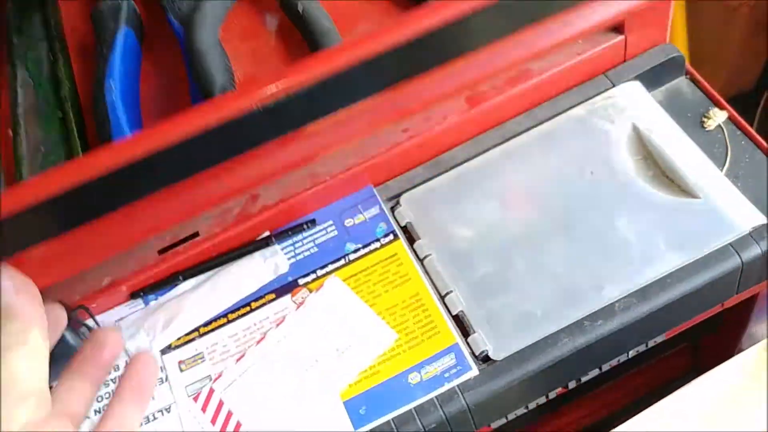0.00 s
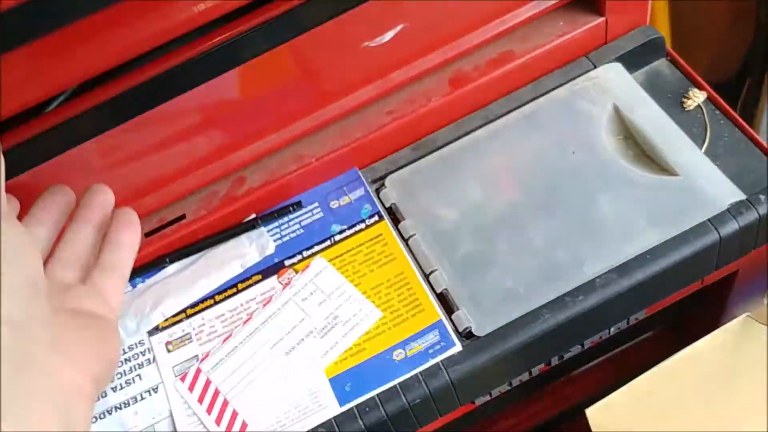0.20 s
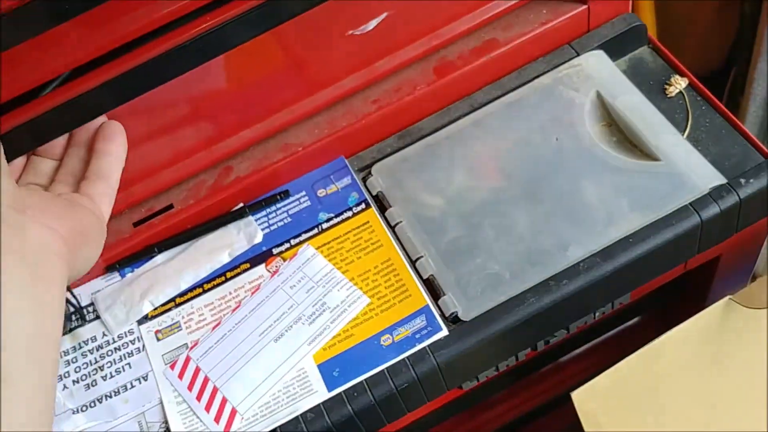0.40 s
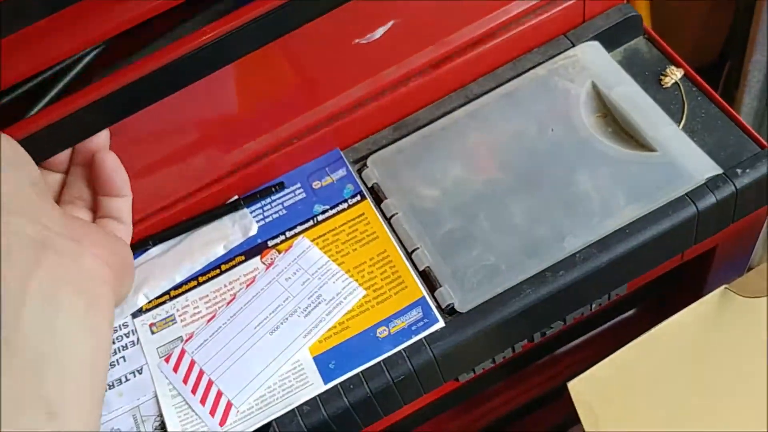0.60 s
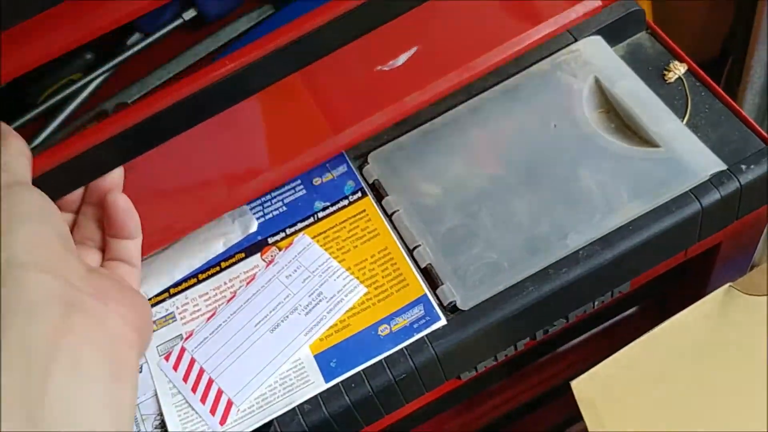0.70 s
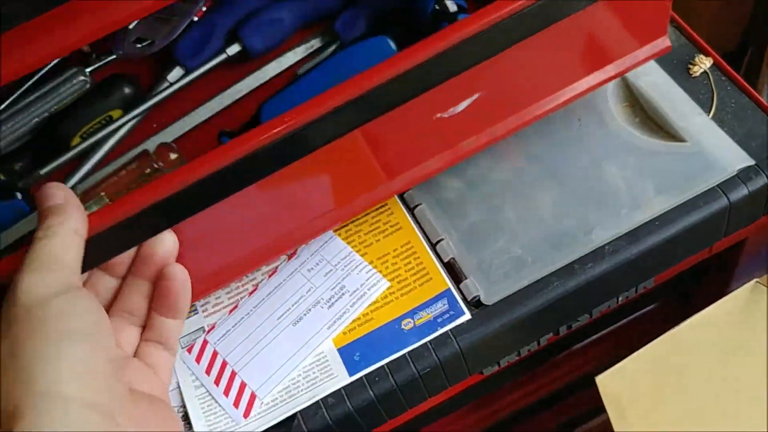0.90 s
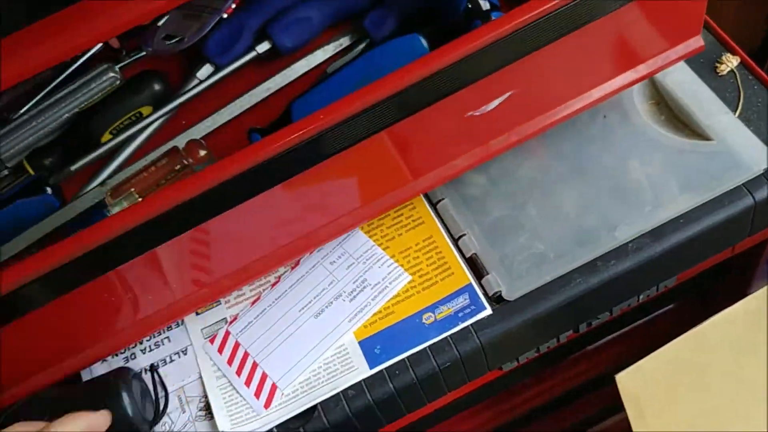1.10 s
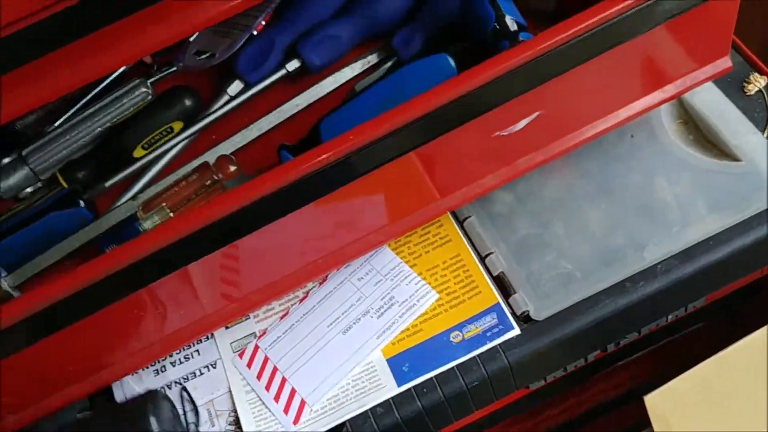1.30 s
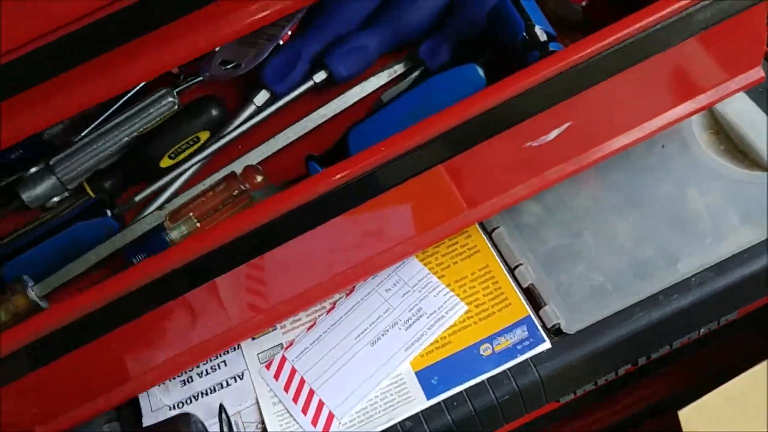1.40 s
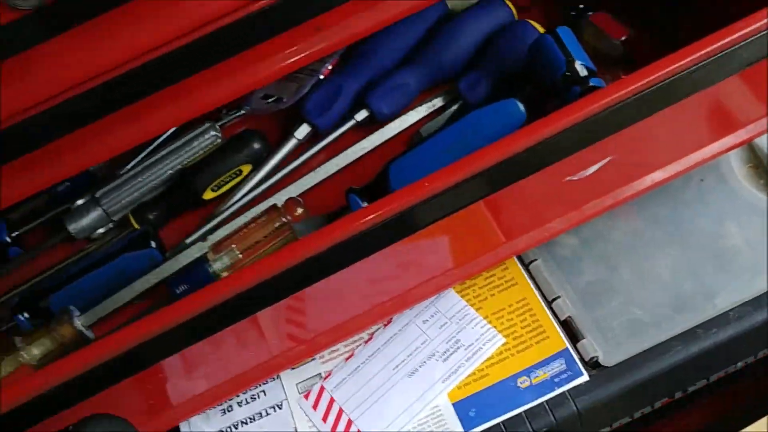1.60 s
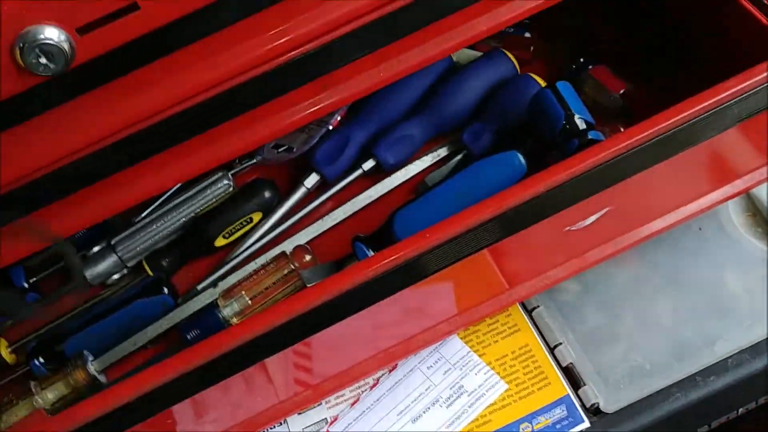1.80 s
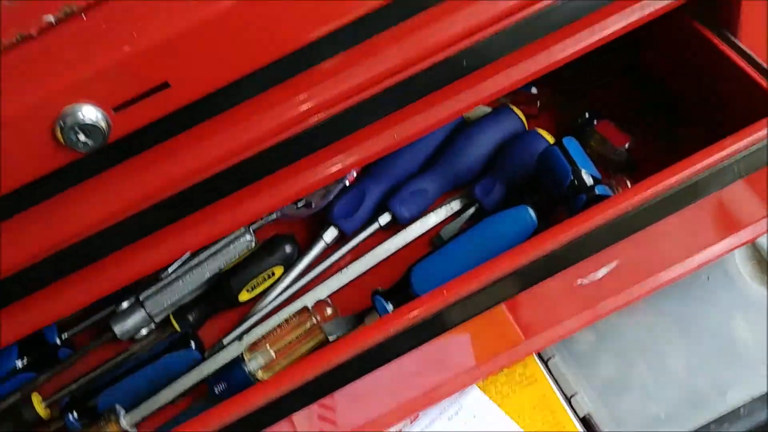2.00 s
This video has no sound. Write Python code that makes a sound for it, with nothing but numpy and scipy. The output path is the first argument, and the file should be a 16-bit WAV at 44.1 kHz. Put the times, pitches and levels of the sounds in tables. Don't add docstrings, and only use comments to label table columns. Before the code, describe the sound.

A steel tool-chest drawer is yanked open close to the microphone in a quiet, humming garage; the latch and slides clatter, hollow panels boom, loose tools knock, the drawer hits its stop, then a sharp clack.

```python
import sys
import numpy as np
from scipy import signal
from scipy.fft import rfft, irfft, next_fast_len
from scipy.io import wavfile
from scipy.ndimage import uniform_filter1d, map_coordinates

SR = 44100
rng = np.random.default_rng(int(sys.argv[2]) if len(sys.argv) > 2 else 0)


def int16_out(signal):
    q = np.round(np.clip(np.atleast_2d(signal).T, -1, 1) * 32767)
    wavfile.write(sys.argv[1], SR, q.astype(np.int16))


def how_loud(loudness_db):
    steps = np.asarray(loudness_db, float) / 20
    return 10 ** steps


N = 92610
CLACK_S = 1.45


def table(points, hz):
    p = np.array(points, float)
    return np.interp(np.log(np.maximum(hz, 1)), np.log(np.maximum(p[:, 0], 1)), p[:, 1])


def conv(x, h):
    size = next_fast_len(N + np.shape(h)[-1])
    return irfft(rfft(x, size) * rfft(h, size), size)[..., :N]


def colour(x, points, share=1):
    size = 4096
    hz = np.arange(size // 2 + 1) * SR / size
    cepstrum = irfft(share * table(points, hz) * np.log(10) / 20)
    cepstrum[1:size // 2] *= 2
    cepstrum[size // 2 + 1:] = 0
    return conv(x, irfft(np.exp(rfft(cepstrum))))


def unit(x):
    return x / np.sqrt(np.mean(x ** 2))


def band(x, hz, width_hz):
    return signal.lfilter(*signal.iirpeak(hz, hz / width_hz, fs=SR), x)


def butter(x, order, hz, kind="low"):
    return signal.sosfilt(signal.butter(order, hz, kind, fs=SR, output="sos"), x)


def decay(t, t60_s):
    return np.exp(-np.log(1000) * t / t60_s)


def walk(rate_hz):
    k = int(SR / rate_hz)
    steps = np.repeat(rng.standard_normal(N // k + 1), k)
    return uniform_filter1d(uniform_filter1d(steps, k), k)[:N]


# frequency in Hz, level in dB per Hz.
HUM_SPECTRUM = [(18, -66), (30, -20.5), (59, -7.5), (145, -6), (179, -32.5), (499, -25), (540, -19.5),
                (1190, -37), (16000, -51.5)]
HUM_DB, WHINE_HZ, WHINE_DB = -51.5, 1205, -22


def hum():
    mid, side, whine = rng.standard_normal((3, N))
    side = butter(side, 1, 700, "high")
    tone = unit(colour(mid + side * np.array([[1], [-1]]), HUM_SPECTRUM))
    return how_loud(HUM_DB) * (tone + how_loud(WHINE_DB) * unit(band(whine, WHINE_HZ, 30)))


# start in seconds, level in dB, length in seconds, centre in Hz, width in Hz.
BRUSHES = [(0.536, -46, 0.0043, 3500, 1184), (0.557, -54.5, 0.054, 2500, 1970),
           (1.056, -58, 0.03, 4200, 90), (1.06, -62, .03, 2950, 120), (1.049, -65, .03, 4800, 120),
           (1.838, -69.5, .04, 3200, 199.4), (0.306, -43, .012, 14000, 5000),
           (0.697, -61.5, .07, 14000, 4000), (1.494, -45.5, 0.022, 13300, 4000),
           (1.264, -50, 0.063, 6000, 6300), (1.346, -51, 0.088, 3500, 2500),
           (1.454, -44.5, 0.033, 3200, 2500), (1.45, -52, .035, 9000, 8000), (1.349, -62, .09, 9000, 8000),
           (1.69, -64.5, .07, 7500, 2970), (1.733, -56.5, 0.11, 3500, 3500),
           (1.893, -67, 0.013, 7000, 3014), (2.047, -57, 0.077, 5230, 2500)]
RUSTLE_PAN_DB = 0.5


def rustle(t):
    out = 0
    for start, db, length_s, hz, width_hz in BRUSHES:
        u = np.maximum(t - start, 0) / length_s
        env = np.minimum(u / 0.19, 1) * np.exp(-np.maximum(u - 0.7, 0) / 0.25)
        grain = rng.standard_normal((2, N)) * how_loud(3 * walk(300))
        out = out + how_loud(db) * env * unit(band(band(grain, hz, width_hz), hz, 2 * width_hz))
    return out * how_loud(np.array([[RUSTLE_PAN_DB], [-RUSTLE_PAN_DB]]) / 2)


ROOM_DB, ROOM_T60_S, ROOM_TOP_HZ, ROOM_DELAY_S = -22.5, 0.42, 2500, 0.006


def room(x):
    u = np.arange(SR // 2) / SR
    h = butter(rng.standard_normal((2, len(u))), 1, ROOM_TOP_HZ)
    h = h * decay(u, ROOM_T60_S) * (u > ROOM_DELAY_S)
    return how_loud(ROOM_DB) * conv(x, h / np.sqrt(np.sum(h ** 2) / 2))


# time in seconds, level in dB.
SLIDE_LOAD = [(0, -42), (.17, -32), (.25, -28), (.45, -24), (.62, -29.5), (.76, -32.5), (.9, -32.5),
              (.96, -30.5), (1.08, -38), (1.22, -34), (1.44, -42), (1.62, -39), (1.8, -55.5), (2.1, -56)]
# frequency in Hz, width in Hz, level in dB.
CABINET_MODES = [(73.6, 28, -12.5), (103.1, 27, -4.5), (150, 62, -5.5), (291, 32, -12.5), (391, 150, -11.5),
                 (522, 66, -15)]
FLICKER_DB, FLICKER_HZ = 2.5, 25


def rumble(t):
    shake = 0
    for hz, width_hz, db in CABINET_MODES:
        level = how_loud(db + FLICKER_DB * walk(FLICKER_HZ))
        noise = rng.standard_normal(N)
        shake = shake + level * unit(band(band(noise, hz, width_hz), hz, 2 * width_hz))
    load_db = np.interp(t, *np.array(SLIDE_LOAD).T) - 1.5
    return unit(shake) * how_loud(load_db)


# start in seconds, level in dB, pitch in Hz, t60 in seconds, damped after in seconds.
PANEL_KNOCKS = [(0.189, -25, 101, 0.67, 0.06), (0.313, -13, 152.2, 3.3, 0.051),
                (.314, -14.5, 299.2, 0.41, 0.06), (.318, -14, 588, 0.2, 0.059),
                (0.378, -6, 152.1, 0.6, 0.1), (.445, -15.5, 176.4, 0.4, 0.033),
                (.452, -11, 135.8, .8, 0.066), (.495, -14, 160.8, 0.76, 0.04),
                (0.383, -19.5, 98.2, 0.67, 0.13), (.44, -14.5, 260.5, 0.21, 0.039),
                (.39, -16.5, 329.3, 0.59, 0.1), (.39, -28, 396.3, 0.76, 0.4),
                (0.441, -27.5, 400, 0.75, 0.059), (.59, -22, 144.6, 0.81, 0.058),
                (.635, -27, 353, 0.29, 0.045), (.685, -23.5, 164.3, 0.44, 0.09),
                (.72, -27, 409, 0.35, 0.048), (0.783, -14, 411, 0.059, 0.049),
                (.829, -8.5, 452, 0.044, 0.032), (.862, -18.5, 415, 0.13, 0.077),
                (0.929, -35, 113.8, 0.89, 0.041), (1.107, -9, 399, 0.027, 0.029),
                (1.118, 2.5, 391, 0.035, 0.047), (1.12, -16, 150, 0.23, 0.27),
                (1.156, -12.5, 407.5, 0.11, 0.054), (1.189, -15, 378.7, 0.11, 0.044),
                (1.169, -26.5, 89.2, .5, 0.11), (1.504, -4.5, 490, 0.04, 0.061), (1.53, -33, 81.7, .5, 0.1),
                (1.51, -29, 153.7, 0.22, 0.16)]
PUSH_CYCLES, DAMP_S = 0.98, 0.019


def knocks(t):
    out = 0
    for start, db, hz, t60_s, held_s in PANEL_KNOCKS:
        u = np.maximum(t - start, 0)
        env = np.clip(u * hz / PUSH_CYCLES, 0, 1) * decay(u, t60_s)
        env = env * np.exp(-np.maximum(u - held_s, 0) / DAMP_S)
        ring = np.sin(2 * np.pi * hz * u) + 0.18 * np.sin(2 * np.pi * 1.41 * hz * u)
        out = out + how_loud(db) * env * ring
    return out


RELEASE_S = 0.014


def burst(t, start, rise_s, hold_s):
    rise = np.clip((t - start) / max(rise_s, 1e-4), 0, 1) ** 2
    return rise * np.exp(-np.maximum(t - start - rise_s - hold_s, 0) / RELEASE_S)


# start in seconds, level in dB, hold in seconds, centre in Hz.
TOOL_KNOCKS = [(0.067, -17.5, 0.033, 2700), (.252, -47, 0.0059, 4300), (0.321, -3, 0.0089, 2300),
               (0.384, -12.5, .06, 914), (0.448, -25, 0.06, 1060), (0.629, -12, 0.016, 1480),
               (0.631, -19.5, 0.017, 2280), (0.773, -41, 0.0034, 1360), (0.836, -10, 0.01, 2824),
               (1.113, -36, .03, 1500), (1.137, -38, .06, 1409), (1.493, -9.5, 0.0049, 3210)]


def tools(t, hits):
    out = 0
    for start, db, hold_s, hz in TOOL_KNOCKS:
        knock = hits * burst(t, start, 0.0053, hold_s)
        out = out + how_loud(db + 2) * band(band(knock, hz, 0.39 * hz), hz, 0.52 * hz)
    return out


# start in seconds, level in dB, rise in seconds, hold in seconds, brightness in dB.
BURSTS = [(0, -31.5, 0.0017, 0.05, -6.5), (0.049, -21.5, 0.051, 0.014, -1.5),
          (0.116, -37.5, 0.0088, 0.043, -23), (0.18, -22, 0.0029, 0.018, -6),
          (0.192, -17, 0.0067, 0.021, -6), (0.239, -10.5, 0.0064, 0.0037, 3),
          (0.287, -19.5, 0.0026, 0.03, -10.5), (0.3086, -12, 0.00094, 0.0051, 15),
          (0.325, -6.5, 0.012, 0.025, -7), (0.365, -15, 0.003, 0.058, -31), (0.565, -44, 0.0075, 0.062, 2),
          (0.626, -26.5, 0.018, 0.0089, 1), (0.647, -37.5, 0.0048, .04, 12), (0.697, -32, 0.019, 0.03, 16),
          (0.761, -16.5, 0.014, 0.0043, -12), (0.791, -31.5, .01, 0.047, -5),
          (0.827, -13.5, 0.0012, 0.011, -10.5), (0.848, -20.5, 0.0024, 0.0058, 14),
          (0.884, -51, 0.0017, 0.004, 4), (0.916, -31.5, 0.0037, 0.015, 4.5),
          (1.106, -17, 0.0017, 0.023, 1), (1.119, -26, 0.0047, 0.008, 1), (1.168, -32, 0.0023, 0.01, 6.5),
          (1.197, -48, 0.0027, 0.01, 0.5), (1.4989, -12, 0.00082, 0.0069, 5.5),
          (1.512, -13, 0.0014, 0.018, -9)]
# time in seconds, level in dB, brightness in dB.
HARD_TICKS = [(.11, -9, -1.5), (.2, -4.5, -0.5), (.213, -7, 3), (.252, -0.5, 0.5), (.3098, -0.5, 8.5),
              (.3412, 4, 3), (.346, 3.5, 6.5), (.354, 3, 3), (.363, 8, 2), (.378, 5, 2.5), (.391, -1, 0),
              (.643, -14.5, 9), (.653, -12, 20), (.7126, -22, 3), (.719, -13.5, 0), (.7784, -6, -8),
              (.8288, -7, -4), (.8503, -3.5, 10), (.861, 2.5, 10), (.923, -16.5, 5.5), (1.1188, -7, 4),
              (1.17, -19, 6), (1.225, -23.5, 8.5), (1.5003, 4.5, 7), (1.507, 1, 4.5), (1.518, -2.5, 7.5),
              (1.525, 2, 3), (1.534, -9, 1.5), (1.555, -12.5, 6.5)]
CONTACTS_PER_S, SCATTER_DB, FIRST_S, TILT_HZ = 2500, 2.5, 0.012, 3500


def contacts(t):
    hits = (rng.random(N) < CONTACTS_PER_S / SR) * np.sign(rng.standard_normal(N))
    hits = unit(hits * how_loud(SCATTER_DB * rng.exponential(size=N)))
    for start, _, rise_s, *_ in BURSTS:
        hits[int((start + rise_s) * SR)] += min(FIRST_S / rise_s, 9)
    dull, bright = np.zeros(N), np.zeros(N)
    for start, db, rise_s, hold_s, tilt_db in BURSTS:
        env = burst(t, start, rise_s, hold_s) * how_loud(db)
        dull += env
        bright += env * how_loud(tilt_db)
    dull, bright = dull * hits, bright * hits
    for start, db, tilt_db in HARD_TICKS:
        dull[int(start * SR)] += how_loud(db)
        bright[int(start * SR)] += how_loud(db + tilt_db)
    push = butter(dull, 2, TILT_HZ) - butter(bright, 2, TILT_HZ, "high")
    return push + tools(t, hits)


# frequency in Hz, t60 in seconds.
SHEET_T60 = [(300, 0.062), (1200, 0.11), (3000, 0.048), (8000, 0.054), (16000, 0.058)]
PLACES, LIKENESS, CRACK_DB, CRACK_S = 4, 0.18, -1, 0.00088


def steel(partials, count=850):
    t = np.arange(SR // 5, dtype=np.float32)[None] / SR
    hz = 250 * 64 ** (rng.random(count) ** 0.55)
    t60_s = table(SHEET_T60, hz) * np.exp(0.59 * rng.standard_normal(count))
    strong_hz, strong_db, strong_t60_s = np.array(partials, float).T
    db = np.r_[np.zeros(count), strong_db]
    db[:count] = 1.5 * np.log(hz) - 10 * np.log10(t60_s)
    db[count:] += 1.5 * np.log(strong_hz) - 10 * np.log10(strong_t60_s)
    hz, t60_s = np.r_[hz, strong_hz][:, None], np.r_[t60_s, strong_t60_s][:, None]
    rings = np.exp(t * (2j * np.pi * hz - np.log(1000) / t60_s).astype(np.complex64))
    shape = (PLACES, 3, len(hz))
    gain = rng.standard_normal(shape) + 1j * rng.standard_normal(shape)
    like = np.clip(LIKENESS + 300 / hz[:, 0], 0, 1)
    gain = np.sqrt(like) * gain[:, :1] + np.sqrt(1 - like) * gain[:, 1:]
    modes = np.real((gain * how_loud(db)).astype(np.complex64) @ rings)
    crack = rng.standard_normal((PLACES, 3, t.size)) * np.exp(-t / CRACK_S)
    crack = crack[:, :1] + 0.78 * crack[:, 1:]
    return (unit(modes) + how_loud(CRACK_DB) * unit(crack)) / np.sqrt(t.size)


# frequency in Hz, level in dB, t60 in seconds.
DRAWER_PARTIALS = [(807, 2.5, 0.22), (909, 6, 0.34), (1225, 5.5, .18), (2352, 11.5, 0.072)]
# frequency in Hz, level in dB, t60 in seconds.
LAST_PART_PARTIALS = [(1300, 7.3, 0.086), (2140, 12, .09), (2480, 12, .06), (3315, 22, .035),
                      (4721, 8.9, .05), (5760, 23, .03), (7780, 8.6, 0.091), (8301, 8.9, 0.055)]
# frequency in Hz, level in dB.
LAST_CLACK_LIFT = [(1000, -2.5), (5000, 11)]
# frequency in Hz, level in dB per Hz.
SHEET_RESPONSE = [(120, -56), (200, -6), (409, -4), (791, -11), (2700, -13.5), (5040, -23), (7830, -32.5),
                  (10500, -38), (16000, -53)]
CLACK_T60_S = 0.24


def clatter(t):
    push = contacts(t)
    drawer, part = steel(DRAWER_PARTIALS), steel(LAST_PART_PARTIALS)
    part = part * decay(t[:part.shape[-1]], CLACK_T60_S)
    place = np.repeat(rng.integers(0, PLACES, N // 64 + 1), 64)[:N]

    def ring(x, responses):
        return sum(conv(x * (place == k), responses[k]) for k in range(PLACES))

    opening = ring(push * (t < CLACK_S), drawer)
    clack = colour(ring(push * (t >= CLACK_S), part), LAST_CLACK_LIFT)
    return how_loud(10.5) * colour(opening + clack, SHEET_RESPONSE)


# frequency in Hz, level in dB.
MIC_COLOUR = [(40, -0.5), (90, 1.5), (6500, -0.5), (8000, 3.5), (9300, 3.5), (10300, -20.5), (11500, -0.5),
              (14000, 14.5)]
PORT_LAG_S, CLACK_DRY = 0.0001, 0.87


def scene():
    t = np.arange(N) / SR
    left, right = clatter(t) + knocks(t) + rumble(t)
    near = np.array([left, map_coordinates(right, [(t - PORT_LAG_S) * SR])])
    to_room = near.mean(axis=0) * (1 - CLACK_DRY * (t >= CLACK_S))
    return colour(near + room(to_room) + rustle(t), MIC_COLOUR) + hum()


def roll_off(x):
    return signal.sosfilt(signal.butter(12, 16470, fs=SR, output="sos"), x)


# frequency in Hz, level in dB.
PORT_DIFFERENCE = [(60, 4.5), (110, 1.5), (200, 2.5), (380, 2.5), (700, 1), (1290, 1), (2380, -3.5),
                   (4400, 0), (8120, 3.5), (15000, 1.5)]
GRILLE_HZ, GRILLE_WIDTH_HZ, GRILLE_DB = 7930, 490, 8
TOP_HZ, LIMIT = 15700, 1.0


def record(dry):
    left = dry[0] + how_loud(GRILLE_DB) * band(dry[0], GRILLE_HZ, GRILLE_WIDTH_HZ)
    x = np.array([colour(left, PORT_DIFFERENCE, 0.73), colour(dry[1], PORT_DIFFERENCE, -0.83)])
    x = signal.sosfilt(signal.ellip(8, 0.2, 70, TOP_HZ, fs=SR, output="sos"), x)
    x = x / (1 + np.abs(x / LIMIT) ** 12) ** (1 / 12)
    return roll_off(x)


dry = scene()
out = record(dry)
int16_out(out)
```